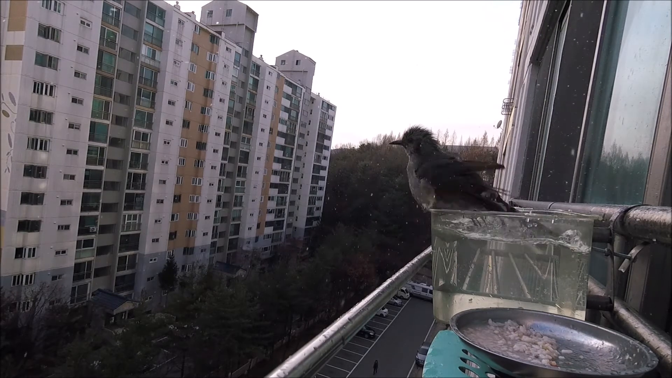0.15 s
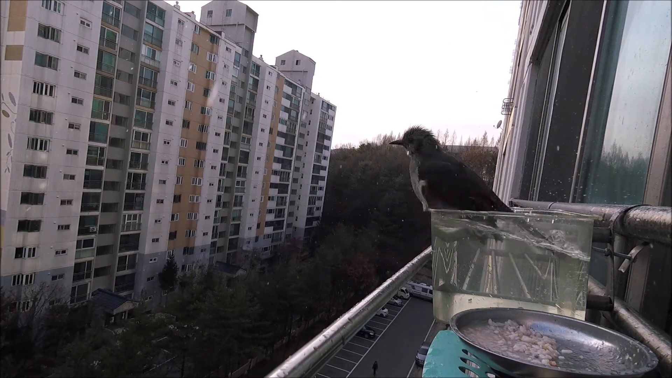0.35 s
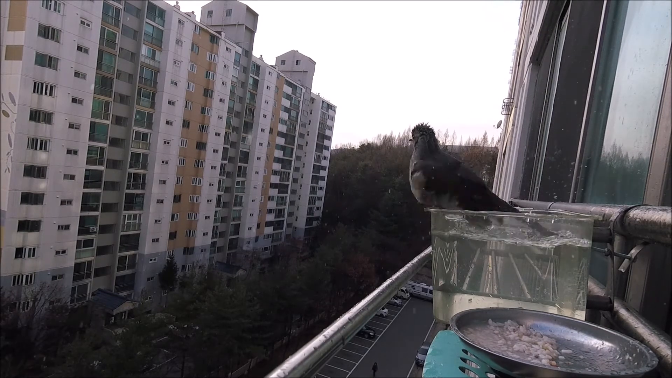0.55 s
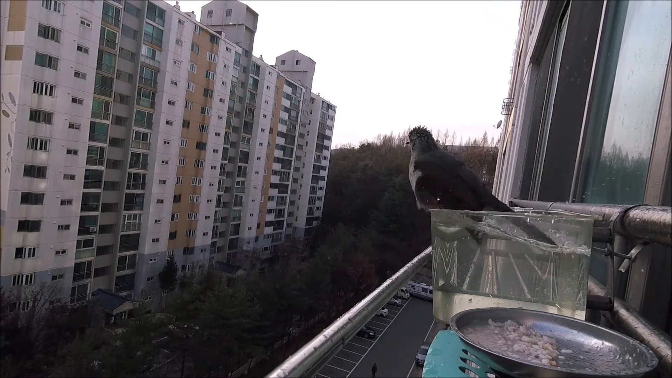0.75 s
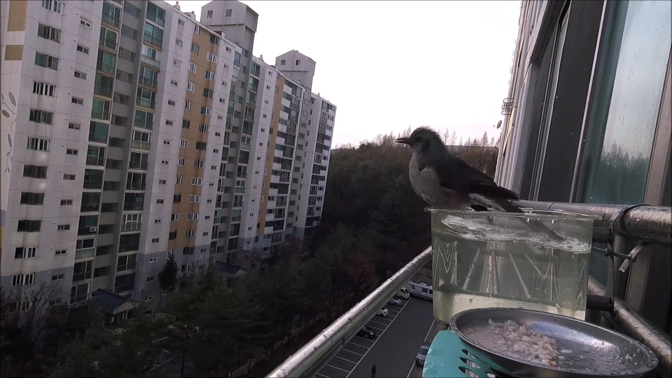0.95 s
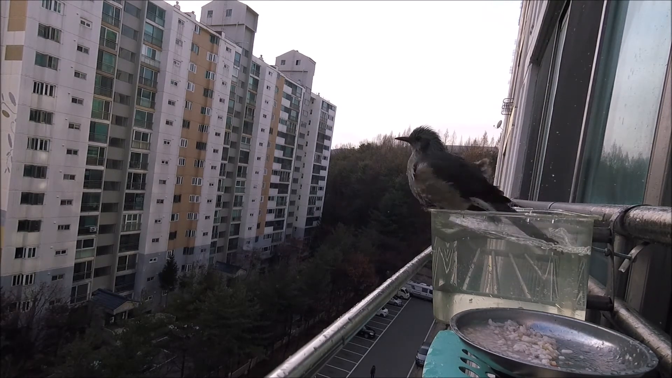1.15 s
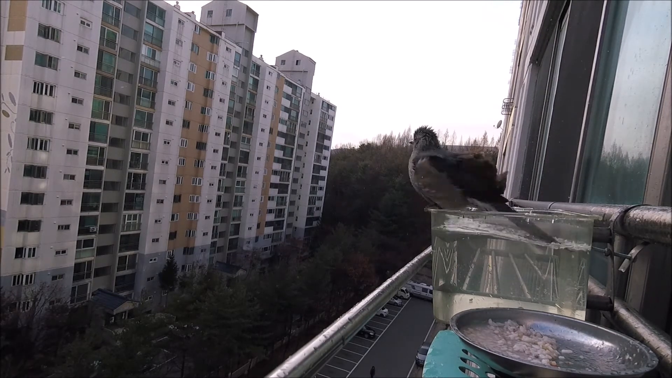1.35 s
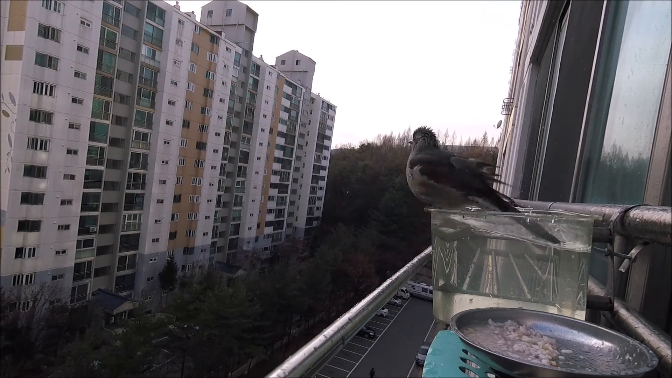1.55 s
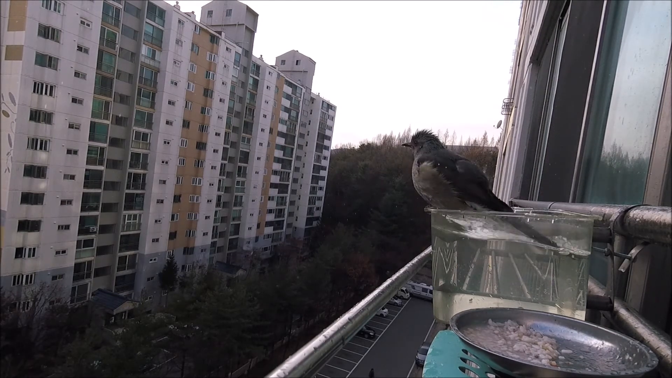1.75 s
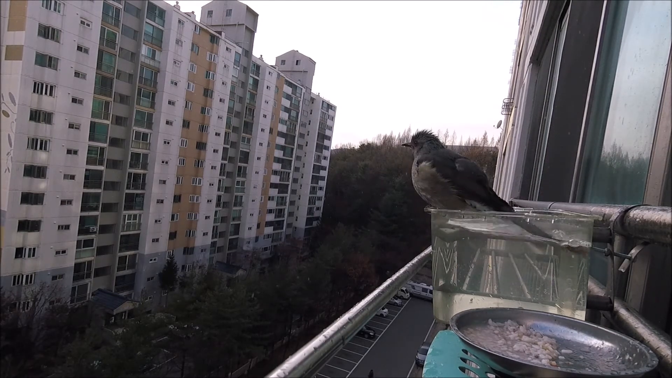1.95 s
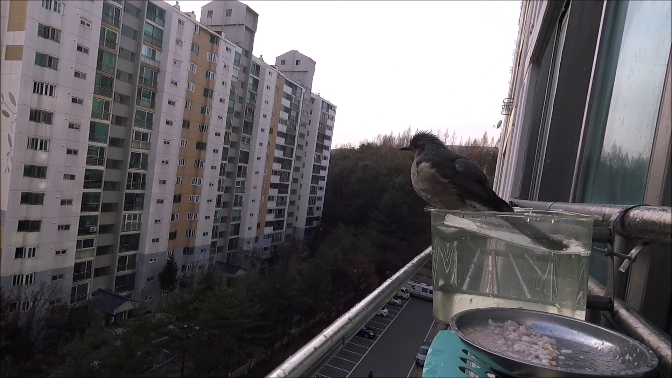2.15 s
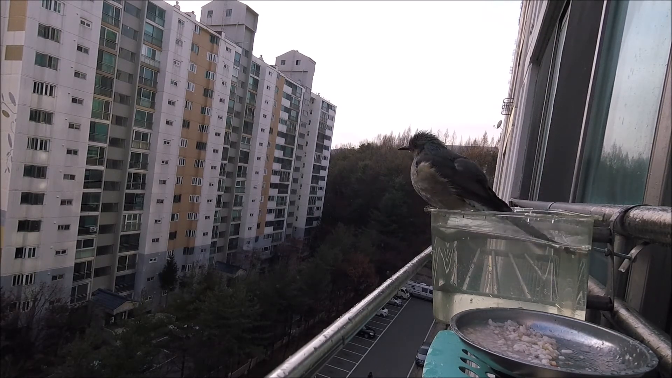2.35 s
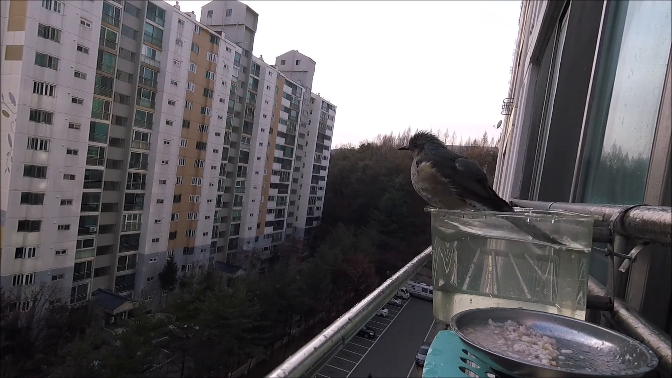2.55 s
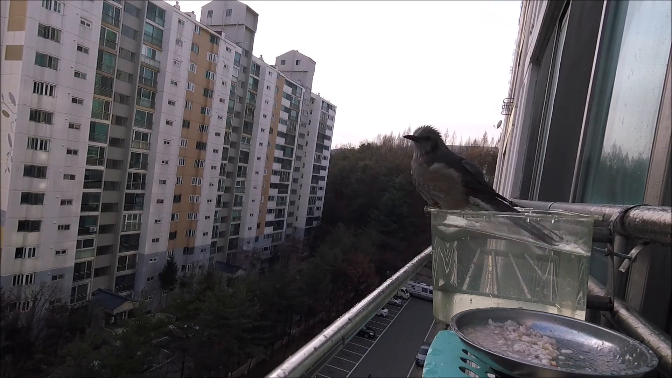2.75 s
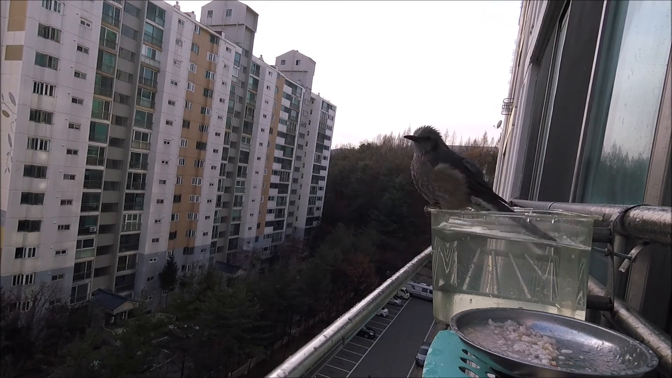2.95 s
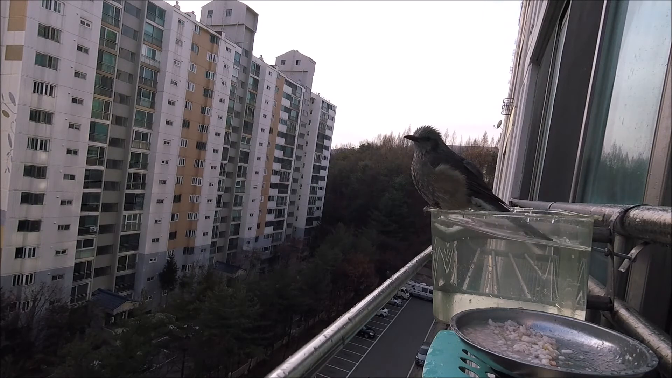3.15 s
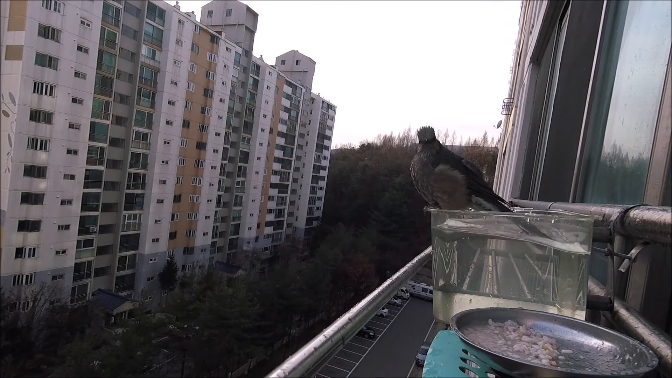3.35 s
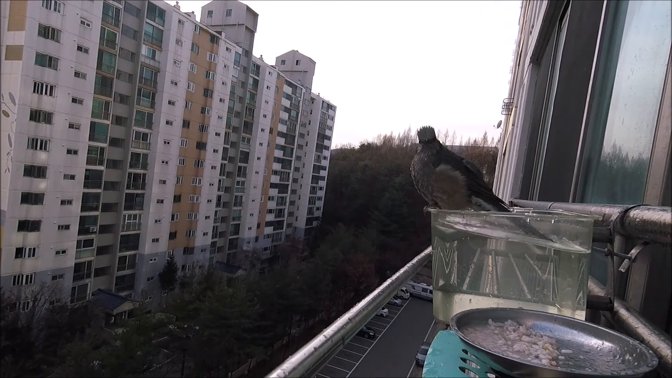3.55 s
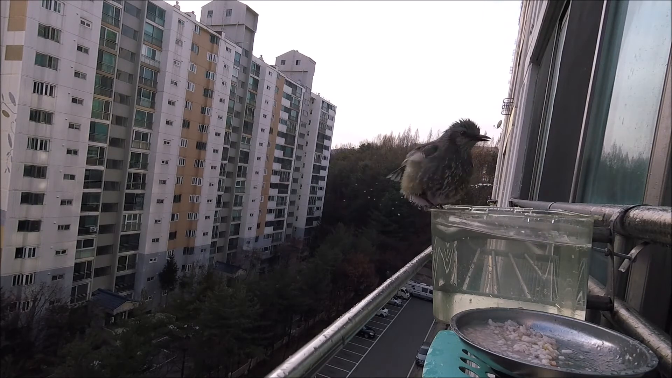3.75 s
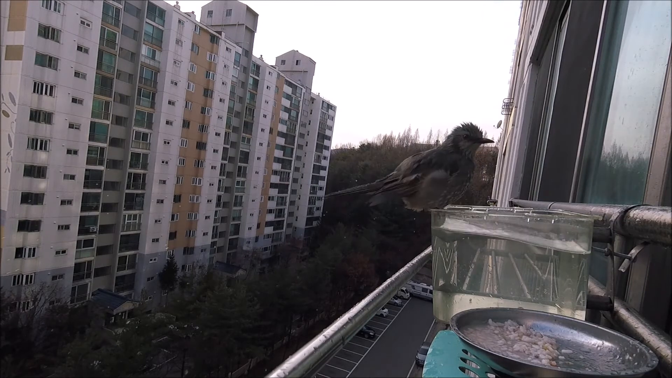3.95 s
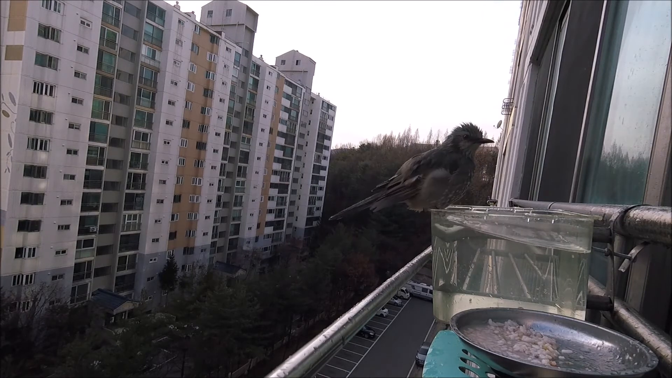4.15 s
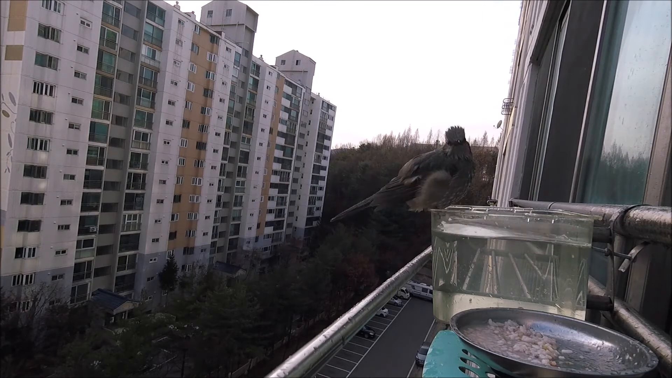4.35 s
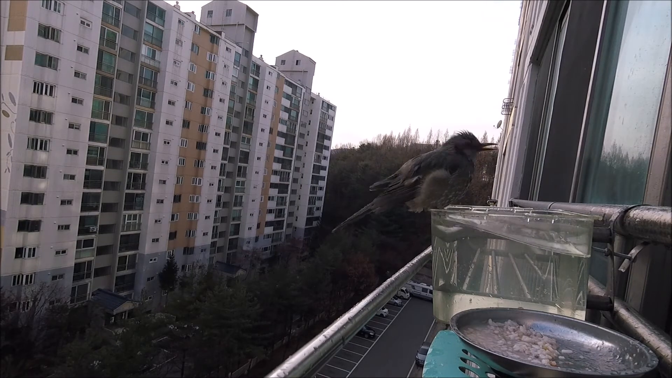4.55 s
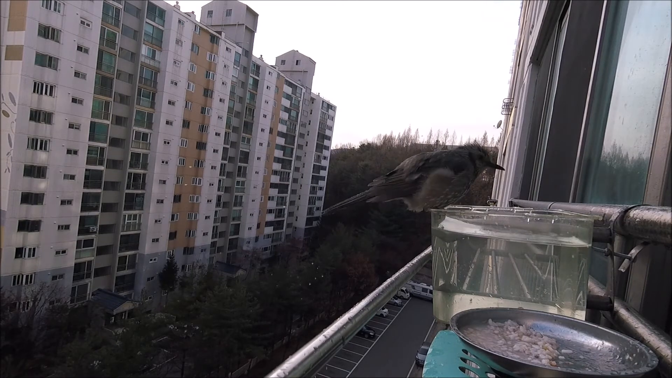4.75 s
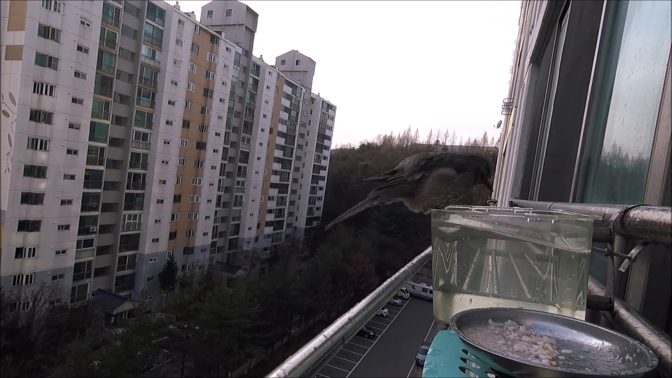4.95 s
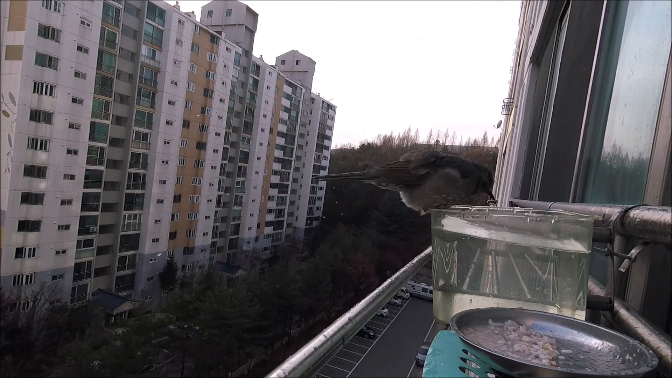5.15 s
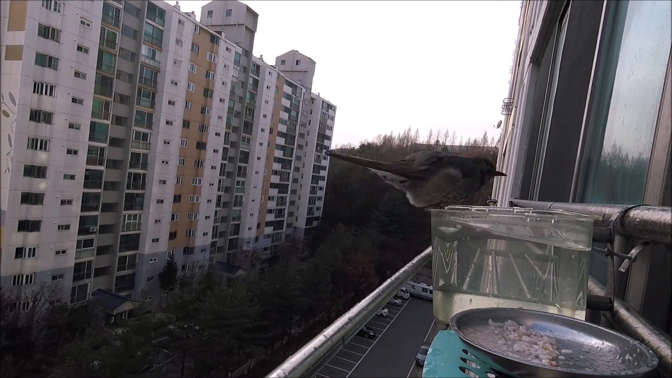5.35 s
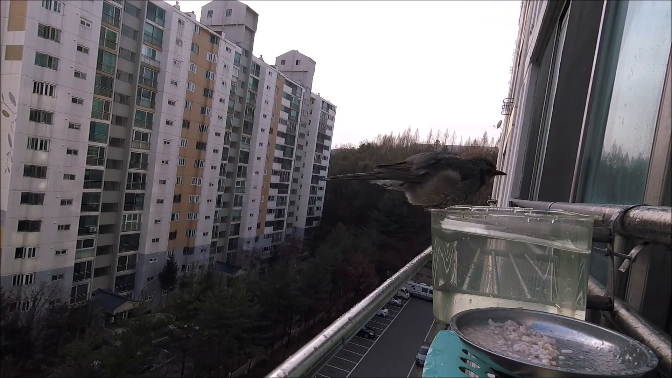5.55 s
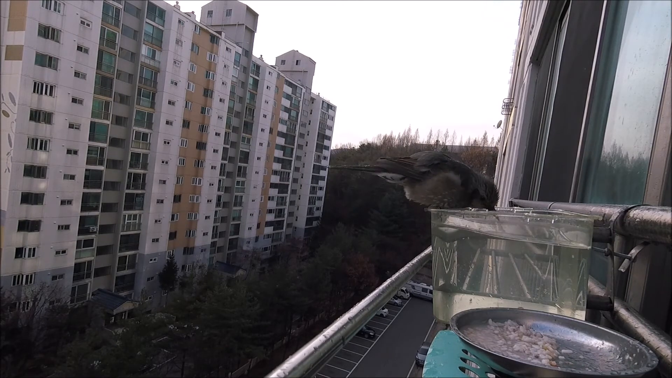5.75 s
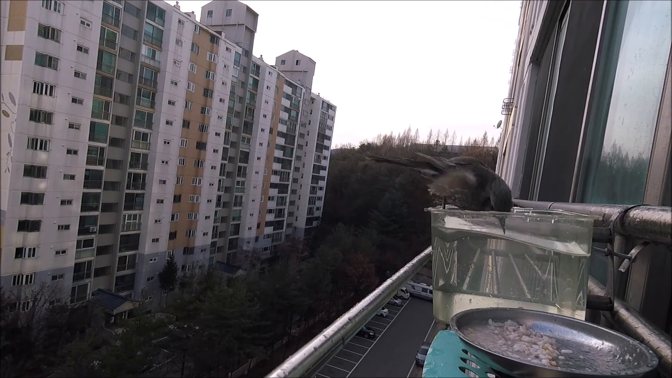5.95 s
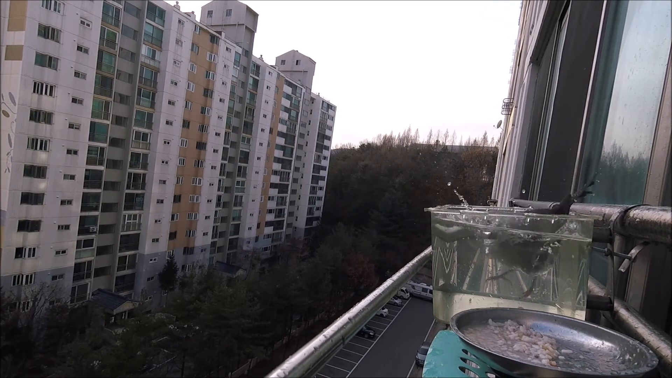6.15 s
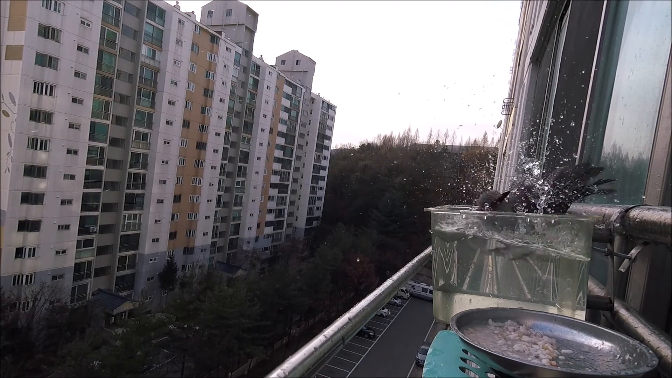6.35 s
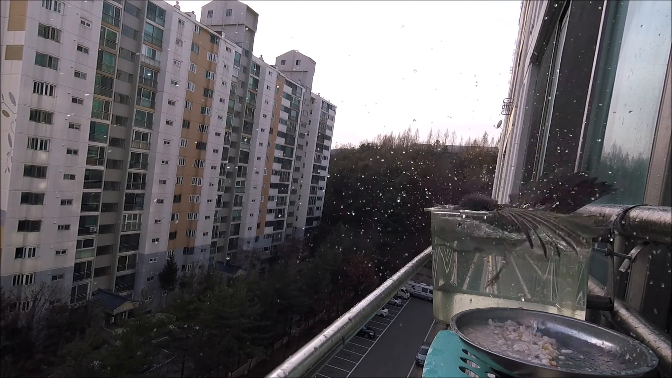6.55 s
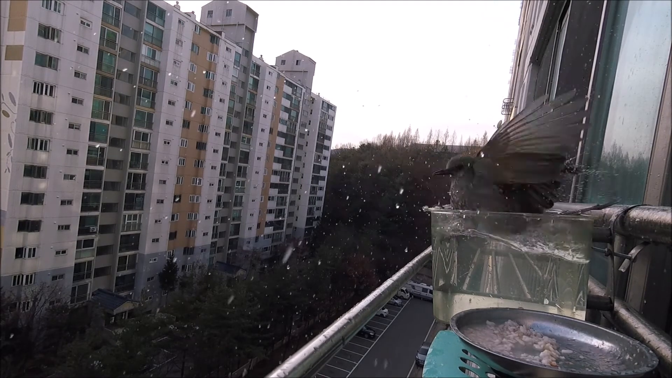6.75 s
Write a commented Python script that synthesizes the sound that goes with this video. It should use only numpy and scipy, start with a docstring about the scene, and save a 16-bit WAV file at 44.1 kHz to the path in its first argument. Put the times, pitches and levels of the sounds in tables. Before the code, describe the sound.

Outdoors on a balcony, with the microphone beside the railing, deep wind buffets from the start over soft distant traffic and a thin high hiss. From 0 to 0.85 s wet feathers flutter rapidly, crisp and papery, with tiny drips. A quieter run of rustles follows at 1.2-1.75 s, with light bumps on the rail. Hops boom hollowly at about 2.8 s and, with a dry click, at 3.83 s; a few feather flicks fall between. The wind sinks away to near quiet around 4.6 s. At 4.87 s comes a small plop and scuffing, then firmer knocks at 5.4 s. One short, harsh, falling chirp sounds at 6.05-6.13 s. Immediately a loud plunge erupts: low gulps, railing thumps, wing slaps, bright bubbles and spray until about 6.6 s, while wind returns. Wet flutters and scattered drops finish, with a last plip at 6.83 s, ending near 6.9 s.

```python
"""Small bird bathing on a balcony

A bird shakes its wet feathers on the rim of a water tub fixed to a balcony railing, hops about, chirps once
and plunges in. Feathers and spray are shaped noise; bubbles and drops are dying sines with a gliding pitch.
Every move taps the railing, a set of ringing modes that boom into the microphone close beside it.
Gusts of deep noise buffet the microphone; traffic, a high hiss and faint whistles reach it from the far town.
"""
import sys
import numpy as np
from scipy import signal
from scipy.fft import rfft, irfft, next_fast_len
from scipy.io import wavfile
from scipy.ndimage import uniform_filter1d, minimum_filter1d

SR = 44100
rng = np.random.default_rng(int(sys.argv[2]) if len(sys.argv) > 2 else 0)


def nominal_scale(level):
    """Amplitude ratio for a level in decibels (scalar or array-like)."""
    x = np.asarray(level, float) / 20
    return 10 ** x


def int16_out(signal):
    """Quantize to a 16-bit WAV file."""
    q = np.round(np.clip(np.atleast_2d(signal).T, -1, 1) * 32767)
    wavfile.write(sys.argv[1], SR, q.astype(np.int16))


N = 303849
T = np.arange(N) / SR


def curves(table):
    """Columns of a table as straight lines over time."""
    s, *columns = np.transpose(table)
    return [np.interp(T, s, c) for c in columns]


def unit(x):
    """Scale to rms 1."""
    return x / np.sqrt(np.mean(x ** 2))


def colour(x, points):
    """Shape a sound by (Hz, dB) points, joined along a log frequency axis."""
    size = next_fast_len(len(x))
    hz, db = np.transpose(points)
    bins_hz = np.arange(size // 2 + 1) * SR / size
    gain = nominal_scale(np.interp(np.log(bins_hz + 1), np.log(hz), db))
    return irfft(rfft(x, size) * gain, size)[:len(x)]


def walk(rate):
    """Random levels held 1 / rate s and slewed twice; spread near 1."""
    k = int(SR / rate)
    held = np.repeat(rng.standard_normal(N // k + 1), k)
    return 1.3 * uniform_filter1d(uniform_filter1d(held, k), k)[:N]


def add(out, s, piece):
    """Mix a piece in at time s."""
    i = max(int(s * SR), 0)
    out[i:i + len(piece)] += piece[:len(out) - i]


def bell(peak, rise, fall):
    """A level that swells to 1 at its peak and fades, each side at its own pace (s)."""
    return np.exp(-((T - peak) / np.where(T < peak, rise, fall)) ** 2)


def bubble(hz, cycles, rise):
    """A shrinking cavity: a sine that dies within some cycles while its pitch glides."""
    turns = np.arange(int(2 * cycles * SR / hz)) * hz / SR
    onset = np.sin(np.pi / 2 * np.minimum(turns / 3, 1)) ** 2
    fade = np.exp(-3 * turns / cycles) * onset
    return fade * np.sin(2 * np.pi * turns * (1 + rise * np.minimum(turns, cycles) / 2))


# Wing and tail strokes on the rim, close to the microphone.
# Each row: start in seconds, relative snap level in dB, time scale of the rustle in seconds.
WING_STROKES = [(0.0195, -29.5, 0.035), (0.068, -25, 0.029), (0.121, -26, 0.031), (0.173, -28.5, 0.037),
                (0.224, -27.5, 0.037), (.245, -31, .008), (0.259, -31, .01), (0.277, -32.5, 0.05),
                (0.299, -32, 0.0074), (0.3326, -29, 0.017), (0.345, -28.5, 0.031), (0.3834, -35, 0.046),
                (0.405, -28.5, 0.018), (0.438, -30.5, 0.04), (0.4907, -30.5, 0.029), (0.548, -32, 0.039),
                (0.568, -28.5, 0.016), (0.604, -34, 0.056), (0.615, -31, .01), (0.66, -31, 0.015),
                (0.679, -36, 0.032), (0.72, -30.5, 0.021), (0.74, -33, 0.018), (0.783, -32.5, 0.043),
                (0.846, -38, 0.045), (1.178, -34, 0.026), (1.207, -34, 0.027), (1.275, -32.5, 0.022),
                (1.315, -36.5, 0.024), (1.365, -38.5, 0.038), (1.425, -40, 0.045), (1.477, -35, 0.03),
                (1.529, -33, 0.029), (1.575, -32, 0.033), (1.631, -33, .012), (1.648, -31.5, 0.024),
                (1.693, -37.5, 0.032), (1.743, -33.5, 0.03), (2.953, -40, .012), (3.057, -33, 0.01),
                (3.16, -33.5, 0.03), (3.271, -34.5, 0.021), (3.769, -39.5, 0.051), (3.827, -38, 0.0091),
                (4.322, -46, 0.013), (4.673, -38, 0.038), (4.873, -32.5, 0.04), (4.911, -41.5, 0.07),
                (4.964, -42, 0.035), (5.376, -42, 0.046), (5.405, -37, 0.029), (6.177, -28.5, .01),
                (6.605, -34, .008), (6.615, -38, .008), (6.642, -35, 0.008), (6.674, -28, 0.016),
                (6.702, -36, .008), (6.724, -31, 0.02), (6.777, -30.5, 0.012), (6.811, -42, 0.03)]
# Tone of the wet barbs. Each row: frequency in Hz, gain in dB.
BARB_COLOUR = [(500, 11), (1500, -2), (2700, -3.5), (4000, -8.5), (5500, -5.5), (6500, -8), (7500, -54),
               (16000, -49)]
# Tone of the finest barbs. Each row: frequency in Hz, gain in dB.
FINE_BARB_COLOUR = [(5000, -33), (7500, -7.5), (10500, -7), (12000, -36), (15000, -27)]
SNAP_S = 0.0017  # time to the peak of a snap
RUSTLE_DB, SHEEN_DB = -5, -11.5  # against the stroke's level, for a stroke of 30 ms
RUSTLE_DB_PER_DOUBLING, SHEEN_DB_PER_DOUBLING = 6.5, -1.5  # per doubling of length; quick flicks are brighter
PATCHY_DB = 4  # unevenness of a rustle


def feathers():
    """Quills snap at each stroke, then wet barbs rustle and fade in patches, full of small ticks."""
    body, sheen = np.zeros(N), np.zeros(N)
    t = np.arange(int(.15 * SR)) / SR
    snap = nominal_scale(4) * (t / SNAP_S) ** 2 * np.exp(2 - 2 * t / SNAP_S)
    for s, db, length in WING_STROKES:
        # a long sweep rustles more than a flick
        doublings = np.log2(length / .03)
        rustle_db = RUSTLE_DB + RUSTLE_DB_PER_DOUBLING * doublings
        sheen_db = SHEEN_DB + SHEEN_DB_PER_DOUBLING * doublings
        noise, ticks = rng.standard_normal((2, len(t))), rng.random((28, 3))
        rustle = nominal_scale(rustle_db - 4 * t / length) * np.minimum(t / .002, 1) / (1 + (t / length) ** 4)
        patches = np.interp(t, np.arange(60) * .0025, rng.standard_normal(60))
        rustle = rustle * nominal_scale(PATCHY_DB * patches)
        add(body, s - .001, nominal_scale(db) * noise[0] * (snap + rustle))
        add(sheen, s - .001, nominal_scale(db + sheen_db) * noise[1] * (snap + nominal_scale(1.5) * rustle))
        for when, pitch, size in ticks:
            tick = bubble(1500 * nominal_scale(16 * pitch), 3 + 7 * size, .004)
            tick_db = db + rustle_db + 16 * size ** 3 - 6.5 - 4 * when
            add(body, s + 1.6 * when * length, nominal_scale(tick_db) * tick)
    return colour(body, BARB_COLOUR) + colour(sheen, FINE_BARB_COLOUR)


# Ringing modes of the railing and tub, beside the microphone.
# Each row: frequency in Hz, relative level in dB, time to fall by 60 dB in seconds.
RAILING_MODES = [(149.1, -9.5, 0.29), (179.3, -1.5, 0.21), (194.2, -2, 0.21), (226.3, 2.5, 0.1),
                 (288.5, -9, 0.2), (332.6, -7, 0.32), (370.3, -1, 0.13), (430, -9.5, 0.24), (487, -8, 0.17),
                 (624, -10.5, 0.078), (880, -22, 0.2), (972, -21, 0.22), (1046, -20.5, 0.25),
                 (1130, -29, 0.19), (1400, -41, 0.08), (1700, -28.5, 0.12), (2290, -45, 0.04)]


def ring(hardness_db, detune):
    """The railing's answer to one tap; a harder tap wakes the high modes; neighbours swing opposite ways."""
    hz, db, t60 = np.transpose(RAILING_MODES)[:, :, None]
    t = np.arange(int(.4 * SR)) / SR
    gain = nominal_scale(db + hardness_db * np.log2(hz / 250))
    gain[1::2] *= -1
    # a padded foot takes about a cycle to load each mode
    swell = 1 - np.exp(-(t * hz / .45) ** 2)
    return np.sum(gain * swell * nominal_scale(-60 * t / t60) * np.sin(2 * np.pi * hz * detune * t), axis=0)


# Feet and body jolting the rim. Each row: start in seconds, relative blow level in dB,
# relative scrape level in dB against the blow, hardness in dB per octave.
RIM_HOPS = [(0.48, -14, -24, -5), (0.633, -14, -22, -1), (1.639, -11, -27, -9), (1.73, -7.5, -43, -3),
            (2.773, 3, -35.5, -5.5), (2.806, -1.5, -42, -15), (2.838, -10.5, -39, -5),
            (2.945, -11, -26, -9), (3.828, 1, -25.5, -0.5), (3.835, -1, -23, -0.5),
            (3.867, -1.5, -47, -1.5), (3.904, -7.5, -44, 0), (3.944, -11.5, -37, -1.5),
            (4.876, -13, -11, -11), (4.889, -8.5, -19, -14), (4.908, -8.5, -19.5, -11.5),
            (4.931, -17.5, -18, -5), (4.952, -12.5, -20, -6), (4.975, -20, -13, -4),
            (5.0, -21.5, -11.5, -2), (5.375, -4, -34, -0.5), (5.394, -15.5, -18.5, 3),
            (5.413, -2, -34, -5.5), (5.454, -8, -45, -4), (5.489, -12.5, -41, -2.5), (6.165, -9, -23, -13),
            (6.208, -7, -37, 1.5), (6.243, -11, -25, 3), (6.286, 3, -27, -4), (6.309, -1.5, -42, -0.5),
            (6.338, -10, -18, 3), (6.364, 2, -38, -7.5), (6.413, -1, -30, -7), (6.436, -0.5, -24.5, -7),
            (6.473, -7.5, -27, 2), (6.502, -3.5, -38, -2.5), (6.522, -4, -36, -1), (6.572, -13.5, -33, 4),
            (6.81, -14.5, -22, 3)]
SHUDDER_DB, SHUDDER_S = -4, 0.024  # against the tap; decay
STROKE_JOLT_DB, STROKE_HARDNESS_DB = 11, -1  # snap level to blow level of the hops; dB per octave


def railing(tremor_db):
    """Wind and weight shake the modes; each hop or stroke is a tap, a shudder and a scrape of claws."""
    tremor = signal.fftconvolve(rng.standard_normal(N), ring(-10.0, 0.94))[:N]
    out = unit(tremor) * nominal_scale(tremor_db + 1.83 * walk(10))
    scrapes = np.zeros(N)
    t = np.arange(int(.15 * SR)) / SR
    fade = np.exp(-t / SHUDDER_S)
    jolts = [(s, db + STROKE_JOLT_DB, -40, STROKE_HARDNESS_DB) for s, db, _ in WING_STROKES]
    for s, db, scrape_db, hardness_db in RIM_HOPS + jolts:
        noise = rng.standard_normal((2, len(t))) * fade
        shudder = nominal_scale(SHUDDER_DB) * noise[0] / np.sqrt(np.sum(fade ** 2))
        push = shudder + (t == 0)
        # the grip of the feet shifts every mode a little
        detune = 1 + 0.016 * rng.standard_normal((len(RAILING_MODES), 1))
        add(out, s, nominal_scale(db - 12.0) * signal.fftconvolve(push, ring(hardness_db, detune)))
        add(scrapes, s, nominal_scale(db + scrape_db + 3.5) * noise[1])
    # the mount passes little below the lowest mode
    out = signal.sosfilt(signal.butter(2, 95, "high", fs=SR, output="sos"), out)
    scrape_colour = [(300, 2), (1000, 9.5), (2500, -6), (4000, -21.0), (6000, -22), (15000, -42)]
    return out + colour(scrapes, scrape_colour)


# Short dry clicks at the landing, in the plunge and among the splashes.
# Each row: start in seconds, relative level in dB, decay in seconds, centre in Hz.
CLICKS = [(3.827, -14.5, 0.0094, 2000), (3.8462, -16.5, 0.00011, 7000), (6.8335, -16, .0006, 1800),
          (4.877, -27, .002, 2000), (6.2455, -16, .0003, 2800), (6.292, -14, .0005, 900),
          (6.3543, -12, .0003, 4000), (6.4155, -18, .0004, 4500), (6.474, -19, .0005, 2500),
          (6.4857, -19, .0005, 6000), (6.532, -18, .0006, 900), (6.263, -21, .0004, 4500),
          (6.339, -18, .0004, 4000)]


def clicks():
    """Dry, wide clicks of fast-dying noise, each centred on its own band; the very top is always dull."""
    out, t = np.zeros(N), np.arange(int(.04 * SR)) / SR
    for s, db, decay, hz in CLICKS:
        onset = np.minimum(t * 1500 + .2, 1)
        click = rng.standard_normal(len(t)) * np.exp(-t / decay) * onset - 3 * (t == 0)
        band = [(hz / 8, -16), (hz / 1.6, -2), (hz, 0), (hz * 1.5, -4), (hz * 2.5, -18), (hz * 8, -30)]
        add(out, s, nominal_scale(db) * colour(click, band))
    return colour(out, [(9000, 0.5), (12000, -3), (16000, -6)])


# Clear bubbles and drops in the tub.
# Each row: start in seconds, level in dB, pitch in Hz, cycles to die away, share of pitch gained per cycle.
CLEAR_BUBBLES = [(.352, -23.5, 5900, 21, 0), (.467, -27, 1860, 15, -0.0031),
                 (.485, -21.5, 995, 22, -0.0014), (.635, -19, 1000, 24, 0.0013),
                 (.66, -22.5, 1010, 28, -0.0012), (.685, -28, 3270, 11, 0), (.805, -29, 3400, 24, 0.00064),
                 (1.275, -31, 3350, 12, -0.0027), (1.646, -26, 3300, 8.9, .006),
                 (2.956, -33, 3200, 11, 0.0019), (4.866, -34, 5600, 55, -0.0027),
                 (4.875, -11.5, 880, 11, -0.0071), (4.89, -38, 5900, 90, -0.0043),
                 (6.165, -14, 1350, 8.8, -0.0058), (6.215, -29, 3800, 16, 0.0075),
                 (6.2455, -10.5, 2700, 15.4, -0.0055), (6.253, -23, 2600, 16, .003),
                 (6.261, -16, 3300, 12, 0.0058), (6.272, -12.5, 1580, 11, -0.0031),
                 (6.232, -20, 4400, 14, 0), (6.261, -21, 5500, 14, 0.0086), (6.268, -23, 5500, 14, 0),
                 (6.277, -20, 5300, 16, .004), (6.279, -21, 1100, 5, 0), (6.294, -18, 1500, 12, 0),
                 (6.338, -24, 4950, 16, 0), (6.36, -23, 3870, 24, -0.0039),
                 (6.364, -11.5, 950, 23, -0.0018), (6.397, -22, 2900, 10, .01), (6.405, -21, 1800, 8, 0),
                 (6.417, -19, 5200, 16, 0.005), (6.423, -26, 4050, 12, 0), (6.426, -12, 1010, 9, 0.00036),
                 (6.432, -28, 4900, 14, 0), (6.434, -13, 1400, 9, 0), (6.450, -31, 6100, 14, 0),
                 (6.475, -12, 1320, 9.1, 0), (6.485, -19, 7800, 24, 0.0023), (6.485, -20, 4000, 14, 0.0042),
                 (6.491, -24, 2980, 12, 0.0091), (6.504, -28, 5050, 18, 0), (6.556, -24, 5460, 12, 0.0099),
                 (6.302, -22, 4950, 24, 0.0039), (6.325, -20, 3100, 24, 0.00026),
                 (6.3395, -7.5, 1275, 16.5, 0.056), (6.382, -29, 4900, 14, .006), (6.390, -25, 4300, 18, 0),
                 (6.414, -7, 1540, 9, -0.0011), (6.435, -18, 3100, 8, .02), (6.465, -24, 2670, 13, 0.012),
                 (6.475, -22, 2900, 10, -0.0022), (6.566, -28, 4730, 17, .002),
                 (6.579, -15.5, 1980, 17, 0.0023), (6.586, -23, 2020, 9, 0), (6.652, -34, 2050, 30, 0),
                 (6.644, -28, 1964, 10, 0), (6.652, -41, 5500, 110, 0.0026), (6.655, -43, 4800, 90, 0.0069),
                 (6.674, -29, 1440, 48, 0.00082), (6.68, -39, 4750, 110, 0.003), (6.644, -35, 4400, 12, 0),
                 (6.675, -26, 5900, 12, 0), (6.698, -30, 1660, 38, -0.0018), (6.722, -35, 2400, 24, 0.0043),
                 (6.721, -34, 4970, 30, 0), (6.809, -37, 5050, 20, .002), (6.823, -37, 5000, 30, -0.0037),
                 (6.605, -32, 1000, 27, -0.01), (6.65, -28, 1020, 38, 0.0015), (6.705, -26, 1020, 25, 0),
                 (6.809, -28, 1500, 7.9, .001), (6.833, -16.5, 1350, 8.9, 0.027),
                 (6.836, -20.5, 2550, 29, 0.0034), (6.841, -26.5, 3690, 20, -0.00021)]
# Deep gulps of the tub as the body heaves in it.
# Each row: start in seconds, level in dB, pitch in Hz, cycles to die away, share of pitch gained per cycle.
TUB_GULPS = [(6.205, -12, 350, 11, 0.0017), (6.281, -1.5, 305, 13.6, .01), (6.325, -5, 363, 7.8, 0.019),
             (6.352, -5.5, 416, 16, 0.0034), (6.436, -1, 358, 10, 0.01), (6.3, -6, 325, 12, 0.0034),
             (6.4, -7, 350, 8.9, 0.0075), (6.497, -5, 380, 8, 0.0045), (6.505, 0.5, 351, 8.2, 0.0059),
             (6.529, -1, 430, 3.8, 0), (6.57, -8, 320, 7.8, 0), (6.598, -10, 368, 7.5, 0),
             (6.622, -10, 388, 8.4, 0.0022)]
# Churned water. Each row: time in seconds, relative level in dB.
CHURN = [(6.14, -61), (6.228, -30.5), (6.3, -25.5), (6.37, -27), (6.43, -29), (6.455, -36), (6.5, -38),
         (6.535, -33), (6.6, -38), (6.7, -31), (6.73, -34), (6.745, -45), (6.77, -40), (6.82, -35.5),
         (6.89, -42)]
SPRAY_DB = -11  # spray against the churned water


def water():
    """Cavities ring as clear bubbles, over a random froth of smaller ones and the noise of spray."""
    clear, froth = np.zeros(N), np.zeros(N)
    for s, db, hz, cycles, rise in CLEAR_BUBBLES + TUB_GULPS:
        add(clear, s, nominal_scale(db) * bubble(hz, cycles, rise))
    start, end = CHURN[0][0], CHURN[-1][0]
    for when, pitch, size, cycles in rng.random((800, 4)):
        hz = 500 * nominal_scale(21 * pitch)
        # small bubbles are higher and weaker
        gain = nominal_scale(13 * size ** 4) * (1000 / hz) ** 0.66
        add(froth, start + when * (end - start), gain * bubble(hz, 4 + 14 * cycles ** 2, .015))
    spray_colour = [(300, -27), (1000, 9.0), (3000, -8), (5500, -1.0), (7500, -19), (15000, -44)]
    spray = unit(colour(rng.standard_normal(N), spray_colour))
    flickering_spray = nominal_scale(SPRAY_DB + 4.4 * walk(90)) * spray
    gate = np.clip((T - start) / .03, 0, 1)
    return clear + gate * nominal_scale(curves(CHURN)[0]) * (nominal_scale(-4.5) * froth + flickering_spray)


# Wings slapping the water. Each row: start in seconds, relative level in dB,
# time scale of the spatter in seconds, brightness in dB per octave (approximate).
WING_SLAPS = [(6.233, -38, 0.0044, 1.5), (6.245, -29, .004, -1), (6.260, -28, 0.011, -1),
              (6.267, -31, 0.0065, 4), (6.277, -25, .012, 1.5), (6.304, -28, 0.0092, 0),
              (6.337, -19, 0.0085, -2.5), (6.353, -18, .011, 0.5), (6.396, -28, 0.0065, -1),
              (6.414, -20.5, .018, 0.5), (6.434, -33, 0.0065, -1), (6.4735, -20, .005, -1.5),
              (6.484, -23, .014, 1.5), (6.503, -37, 0.013, 4.5), (6.5555, -33, .008, -2)]
SLAP_RISE_S, SLAP_WASH_DB = 0.0024, -5  # time to the peak of the blow; wash against the blow


def slaps():
    """A wide burst a few ms long breaks up into a fading wash and a spatter of short gliding drops."""
    out, t = np.zeros(N), np.arange(int(.1 * SR)) / SR
    for s, db, length, bright_db in WING_SLAPS:
        blow = t / SLAP_RISE_S * np.exp(1 - t / SLAP_RISE_S)
        wash = nominal_scale(SLAP_WASH_DB) * np.minimum(t / SLAP_RISE_S, 1) * np.exp(-t / length)
        burst = rng.standard_normal(len(t)) * (blow + wash) / 2
        for when, pitch, size in rng.random((36, 3)):
            # drops thin out with time, and late ones are weaker
            late = -np.log(1 - .97 * when)
            drop = bubble(900 * nominal_scale(17 * pitch), 5 + 8 * size, 0.0067)
            add(burst, late * length, nominal_scale(4.4 * size ** 2 - 4.9 * late) * drop)
        tone = [(300, -2 * bright_db + 2), (1200, -bright_db), (2400, 0), (6400, 2.1 * bright_db - 5.5),
                (8000, 2 * bright_db - 8), (15000, 2.5 * bright_db - 25)]
        add(out, s - .001, nominal_scale(db) * colour(burst, tone))
    return out


# Pitch of the call, before its roughness. Each row: time in seconds, pitch in Hz.
CALL_PITCH = [(6.035, 1934), (6.05, 1909), (6.07, 1939), (6.089, 1916), (6.1, 1843), (6.11, 1766),
              (6.118, 1680), (6.124, 1800), (6.14, 1740)]
# Partials of the call, each swelling and fading in turn. Each row: multiple of the pitch,
# relative peak level in dB, peak time in seconds, rise in seconds, fall in seconds.
CALL_PARTIALS = [(1, -31.5, 6.066, 0.05, 0.024), (1, -39, 6.088, 0.0031, .005),
                 (2.5, -43, 6.088, .003, .004), (3, -32, 6.05, 0.0014, 0.0065), (5, -50, 6.1, .004, .008),
                 (2, -9.5, 6.094, 0.032, 0.012), (3, -24, 6.063, 0.013, 0.032),
                 (4, -27.5, 6.098, 0.032, 0.013), (5, -47.5, 6.082, 0.022, .012),
                 (6, -45, 6.104, .01, 0.0099), (6, -55, 6.085, .015, .008), (2, -28, 6.115, 0.0046, 0.0047),
                 (4, -42, 6.113, .006, .006)]
# A thin line that rises as the fifth partial falls.
# One row: relative peak level in dB, peak time in seconds, rise in seconds, fall in seconds.
RISING_LINE = (-48, 6.1, .018, .009)
MIRROR_HZ = 22050  # the thin line lies at this frequency less five times the pitch


def chirp():
    """One harsh call: a stack of partials whose weight moves upward as it turns rough and falls."""
    hz, = curves(CALL_PITCH)
    start, end = CALL_PITCH[0][0], CALL_PITCH[-1][0]
    rough = np.clip((T - 6.095) / .012, .2, 1)
    phase = 2 * np.pi * np.cumsum(hz * (1 + .008 * rough * walk(500))) / SR
    out = 0
    for k, db, peak, rise, fall in CALL_PARTIALS:
        swell = bell(peak, rise, fall)
        out = out + np.sqrt(2) * nominal_scale(db) * swell * np.sin(round(2 * k) / 2 * phase)
    db, peak, rise, fall = RISING_LINE
    mirrored = 2 * np.pi * MIRROR_HZ * (T + .25 / SR) - 5 * phase
    out = out + nominal_scale(db) * bell(peak, rise, fall) * np.sin(mirrored)
    flutter = nominal_scale(5 * rough * np.clip(walk(300), -2, .6))
    out *= flutter * np.clip(np.minimum(T - start, end - T) / .004, 0, 1)
    # the window pane behind the tub returns it a moment later
    return out + nominal_scale(-14.0) * np.roll(out, int(0.0087 * SR)) + nominal_scale(-24) * np.roll(out, int(0.019 * SR))


# Wind on the bare microphone. Each row: time in seconds, level in dB before the gusts.
WIND_LEVEL = [(0.0, -17.5), (0.06, -12.5), (0.5, -5.5), (0.63, -13.5), (0.9, -14.5), (1.4, -15.5),
              (1.75, -12.5), (2.4, -15.5), (2.65, -18), (3.0, -24.5), (3.5, -29), (4.0, -38.5), (4.4, -42),
              (4.64, -62), (4.82, -52), (5.1, -30), (5.5, -26.5), (5.65, -29), (6.14, -29.5), (6.55, -17),
              (6.8, -15.5), (6.89, -14)]
# Spectrum of the wind. Each row: frequency in Hz, relative density in dB per Hz.
WIND_SPECTRUM = [(8.8, -18), (15, -0.5), (27, -6), (38, 2.5), (52, -2), (156, -15), (198, -16.5),
                 (258, -31), (300, -26), (390, -51), (660, -120)]
# The wind above about 60 Hz, against its deep part. Each row: time in seconds, gain in dB.
UPPER_WIND = [(0, -2.5), (.3, -5.5), (.55, -3), (.8, -0.5), (2.5, 0), (3.4, 4.5), (4.5, -1), (5.3, 0.5),
              (6.1, 1), (6.89, 1)]
GUST_DB, GUSTS_PER_S = 1, 11  # spread of the random level; its steps per second


def wind():
    """Turbulence at the microphone: deep noise that throbs in gusts; its upper part has its own level."""
    level_db, = curves(WIND_LEVEL)
    noise = unit(colour(rng.standard_normal(N), WIND_SPECTRUM))
    gusts = noise * nominal_scale(level_db + GUST_DB * walk(GUSTS_PER_S))
    top = colour(gusts, [(50, -40), (70, 0)])
    return gusts + (nominal_scale(curves(UPPER_WIND)[0]) - 1) * top


# Spectrum of the distant traffic. Each row: frequency in Hz, relative density in dB per Hz.
TRAFFIC_SPECTRUM = [(180, -8), (300, -3.5), (390, -11.5), (521, -6.5), (987, -14.5), (1330, -17),
                    (1730, -24.5), (2460, -28), (4070, -40.5), (6000, -39.5), (7800, -57), (13200, -120)]
# Spectrum of the far hiss. Each row: frequency in Hz, relative density in dB per Hz.
HISS_SPECTRUM = [(2650, -33.5), (4500, -27.5), (5150, -14), (5810, -7.5), (6580, 2.5), (7810, 3),
                 (13800, -7.5), (14700, -14.5), (15600, -19)]


def town(traffic_db, hiss_db):
    """Distant traffic, noise that flickers a little, and a smooth high hiss."""
    traffic = unit(colour(rng.standard_normal(N), TRAFFIC_SPECTRUM))
    hiss = unit(colour(rng.standard_normal(N), HISS_SPECTRUM))
    flicker_db = 1.2 * walk(14)
    return traffic * nominal_scale(traffic_db + flicker_db) + hiss * nominal_scale(hiss_db + 0.53 * walk(8.1))


# Faint whistles from far away. Each row: start in seconds, end in seconds, pitch in Hz,
# level in dB before its waver, waver of the pitch as a share of it.
FAR_WHISTLES = [(1.42, 1.71, 5360, -59, .001), (3.152, 3.193, 2020, -49.5, .004),
                (3.212, 3.258, 1960, -49.5, .004), (5.16, 5.262, 10600, -67, .002)]


def whistles():
    """Thin tones from far away: sines that waver slightly in pitch and level."""
    out = 0
    for start, end, hz, db, unsteady in FAR_WHISTLES:
        gate = np.clip(np.minimum(T - start, end - T) / 0.0055, 0, 1)
        waver = nominal_scale(3.5 * walk(60))
        phase = 2 * np.pi * hz * np.cumsum(1 + unsteady * walk(90)) / SR
        out = out + gate * waver * nominal_scale(db) * np.sin(phase)
    return out


# Changing levels of the background at the microphone, before a small random flicker. Each row:
# time in seconds, railing tremor in dB (before the mount's low cut), traffic in dB, far hiss in dB.
BACKGROUND = [(0.0, -20.5, -32, -57.5), (0.5, -19.5, -34, -57), (0.8, -34, -36, -58.5),
              (1.36, -25.5, -33, -57.5), (1.8, -30, -35, -57.5), (2.3, -26, -32.5, -55),
              (2.75, -24.5, -30.5, -53.5), (3.0, -25, -33, -55.5), (3.75, -24.5, -34.5, -53.5),
              (4.01, -24, -40.5, -60.5), (4.47, -34.5, -40, -59), (4.85, -31, -37.5, -59),
              (5.43, -26.5, -38, -57), (5.89, -25, -34.5, -53.5), (6.24, -20, -31, -51.5),
              (6.41, -14, -28.5, -53.5), (6.66, -19, -36, -56.5), (6.89, -21.5, -31.5, -55.5)]


def scene():
    """Everything meets at one microphone beside the railing."""
    tremor_db, traffic_db, hiss_db = curves(BACKGROUND)
    bird = feathers() + railing(tremor_db) + clicks() + water() + slaps() + chirp()
    ambience = wind() + town(traffic_db, hiss_db) + whistles()
    return (bird + ambience)[None]


def band_limit(x):
    """A steep low-pass at the top of the band."""
    return signal.sosfilt(signal.butter(12, 15750, fs=SR, output="sos"), x)


def record(dry):
    """A limiter turns the loudest booms down just ahead of their peaks."""
    top, reach = .86, int(.006 * SR)  # ceiling; reach in samples
    need = np.minimum(top / (np.abs(dry) + 1e-9), 1)
    gain = uniform_filter1d(minimum_filter1d(need, 2 * reach), reach)
    return band_limit(dry * gain)


dry = scene()
out = record(dry)
int16_out(out)
```